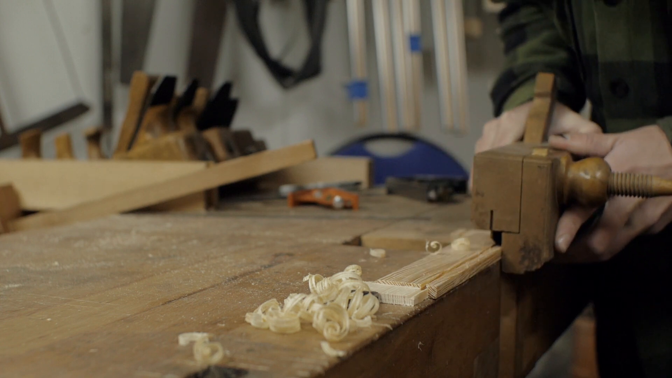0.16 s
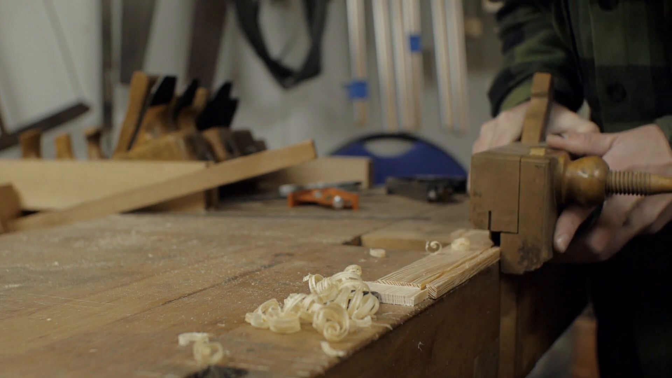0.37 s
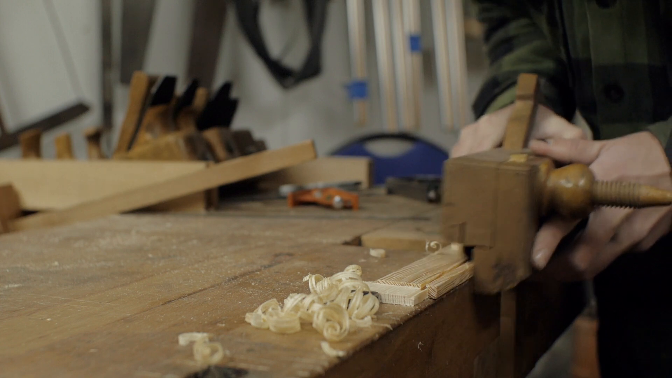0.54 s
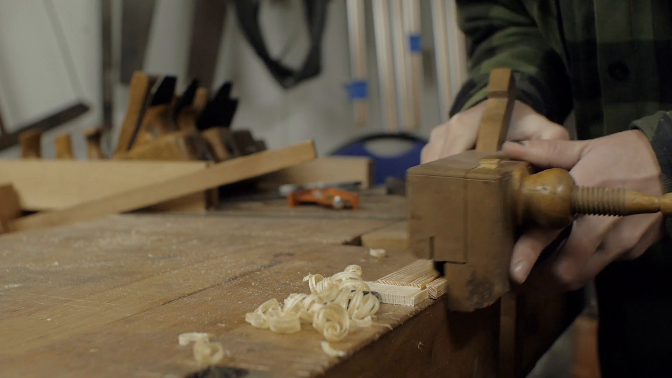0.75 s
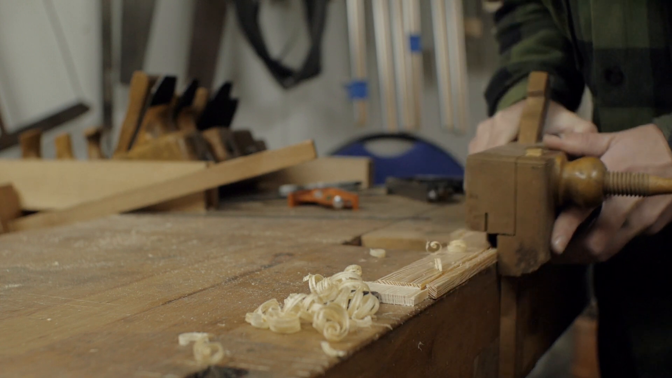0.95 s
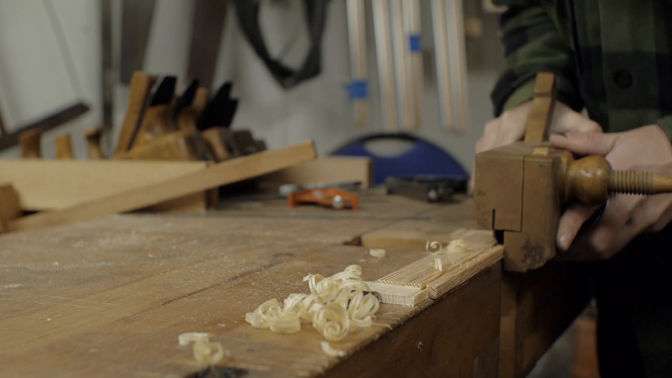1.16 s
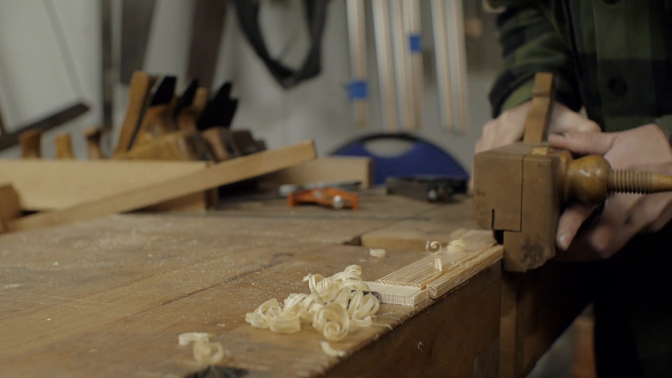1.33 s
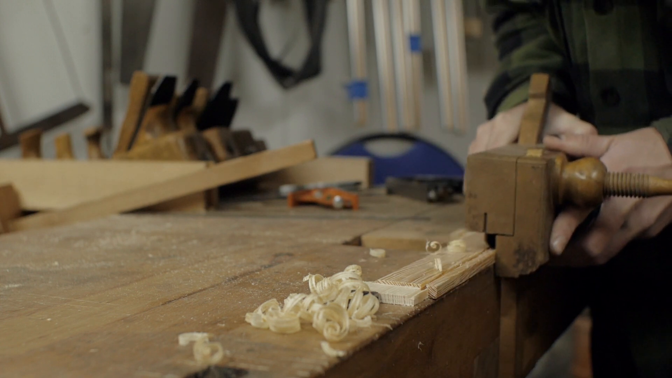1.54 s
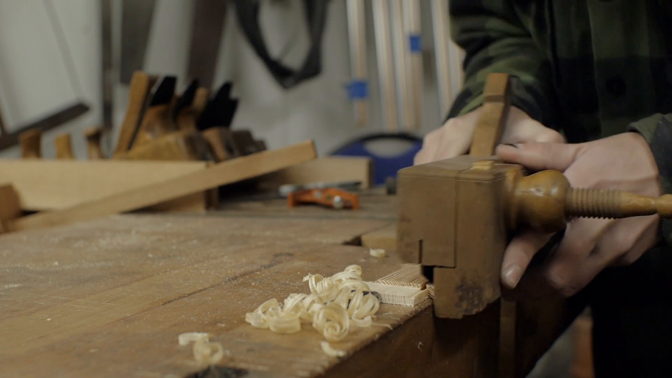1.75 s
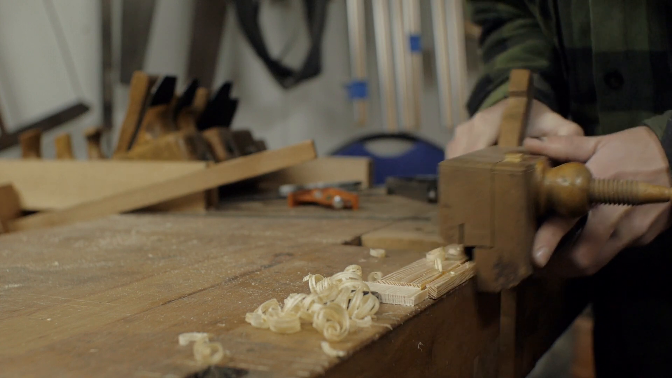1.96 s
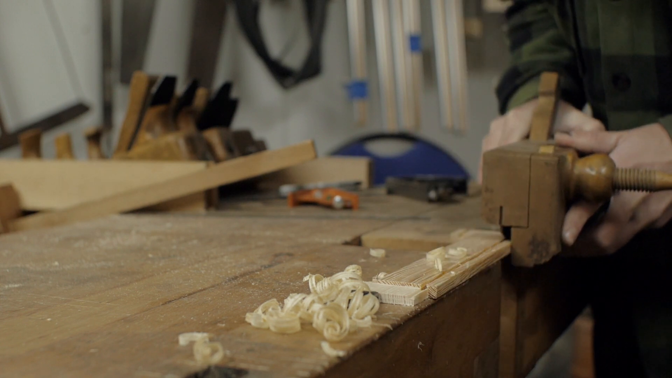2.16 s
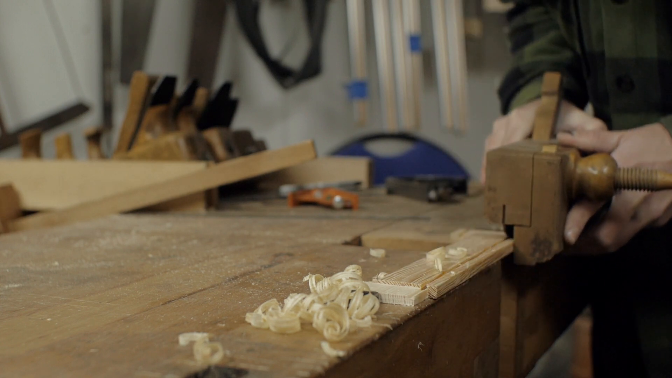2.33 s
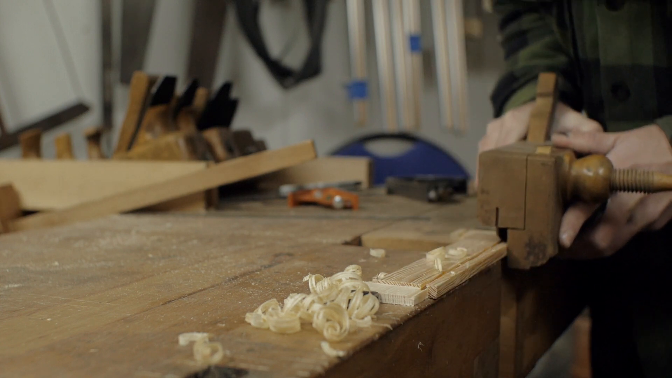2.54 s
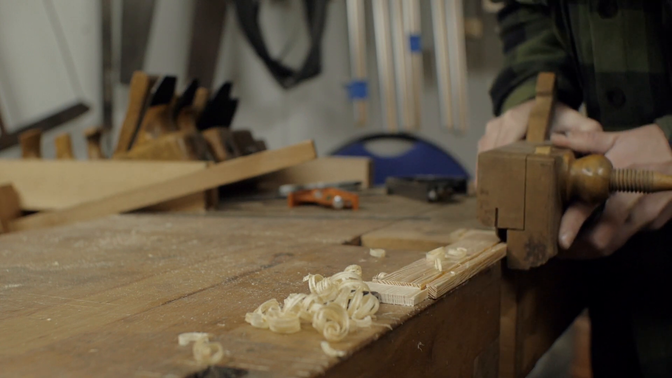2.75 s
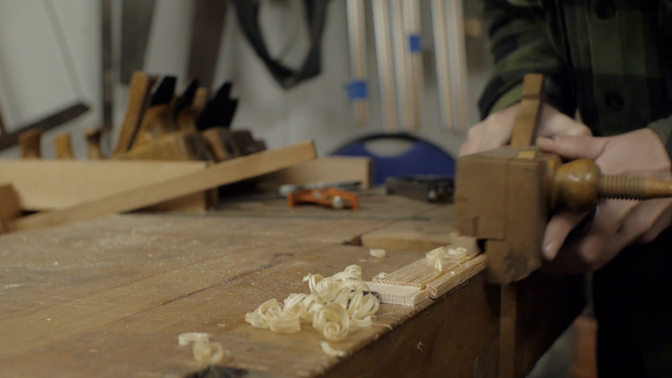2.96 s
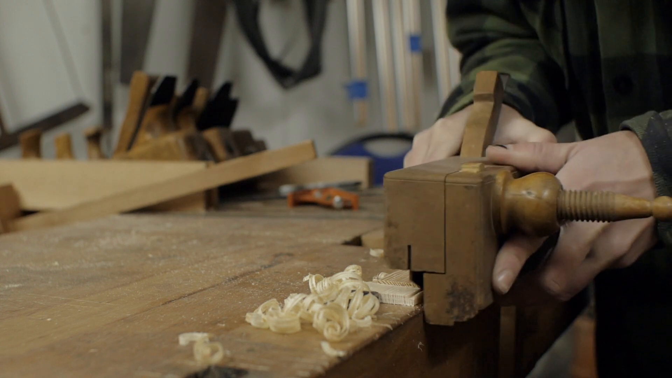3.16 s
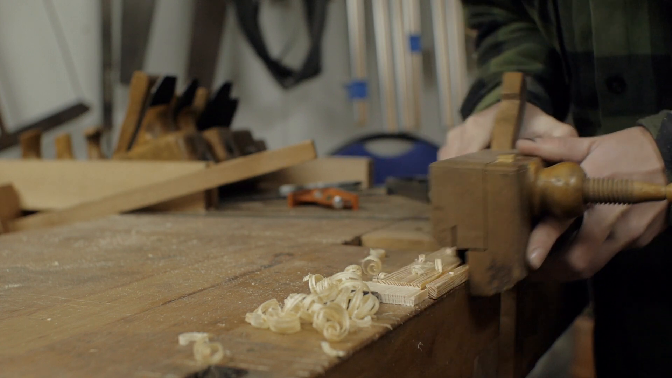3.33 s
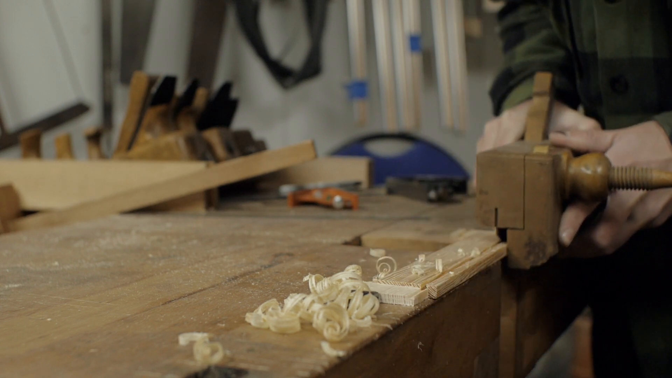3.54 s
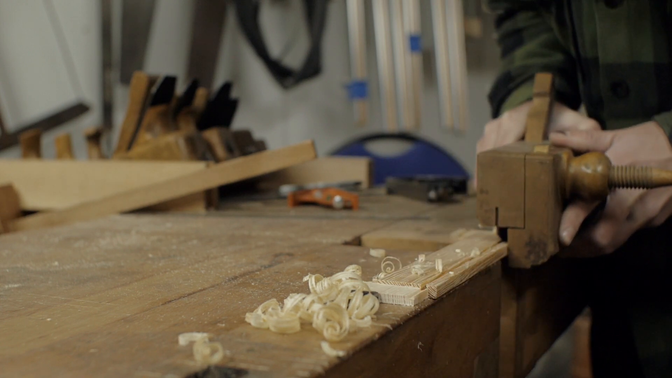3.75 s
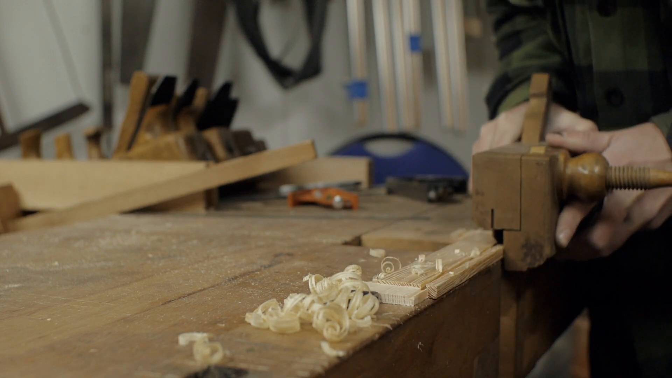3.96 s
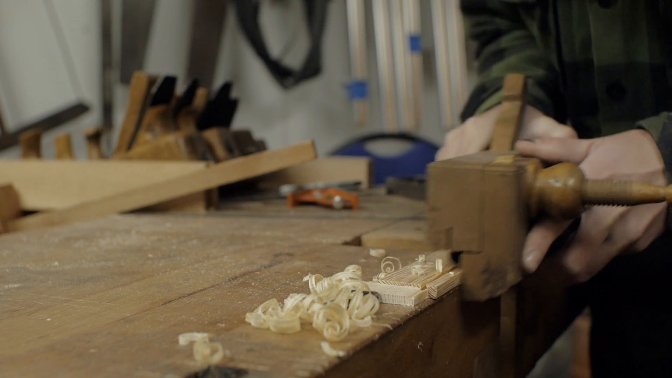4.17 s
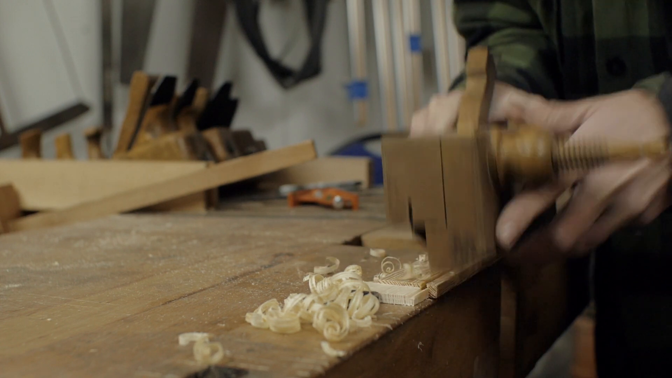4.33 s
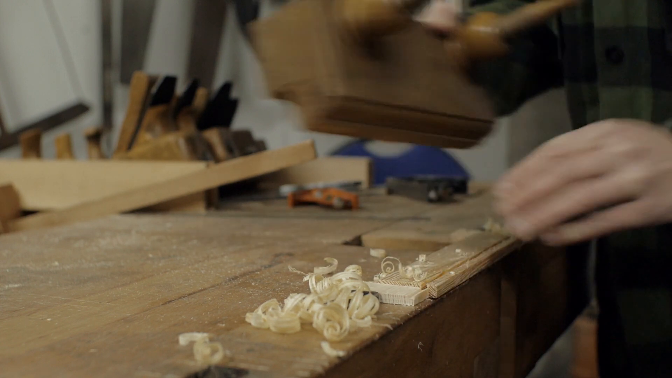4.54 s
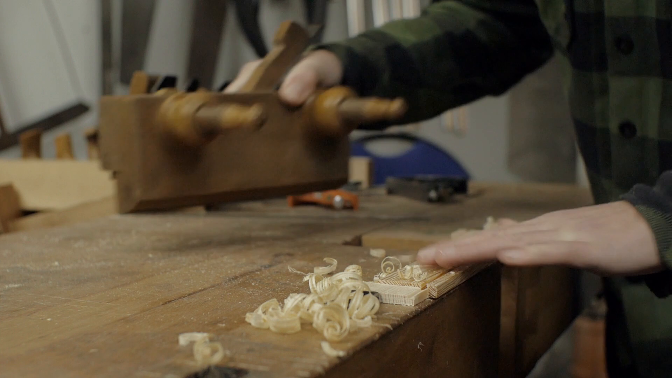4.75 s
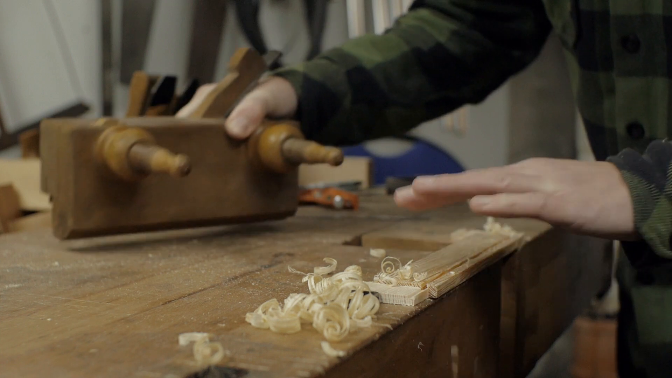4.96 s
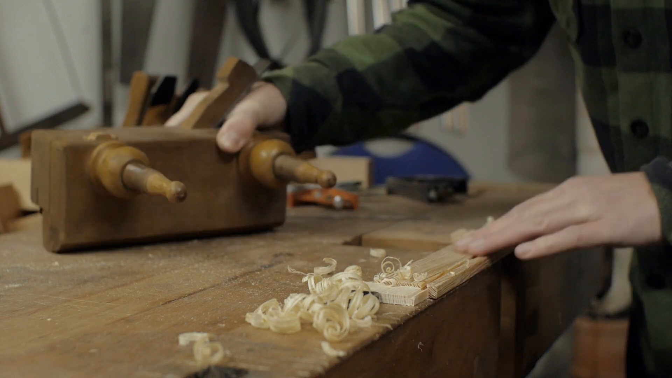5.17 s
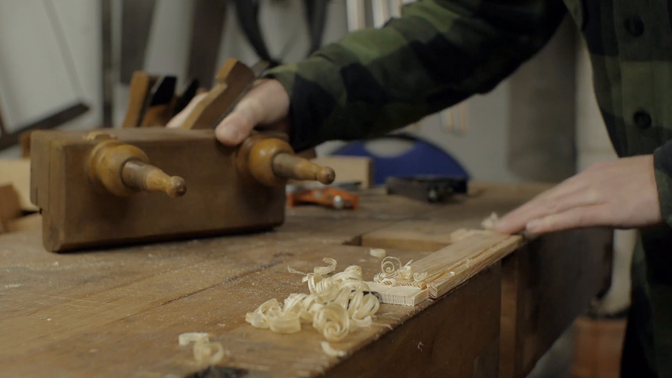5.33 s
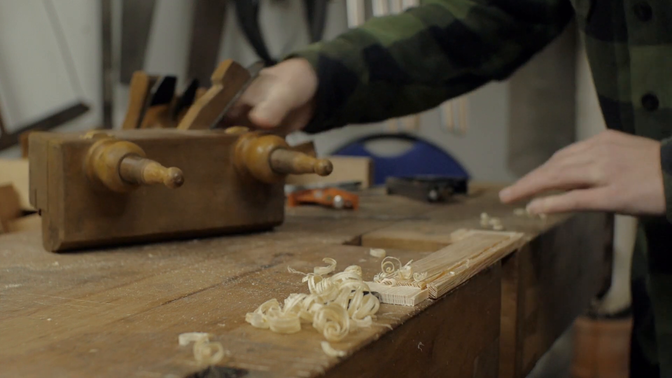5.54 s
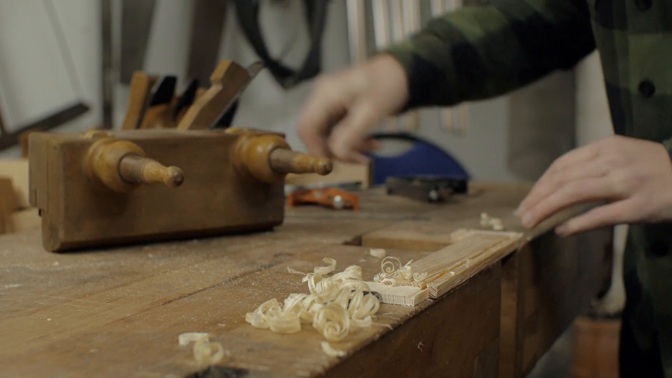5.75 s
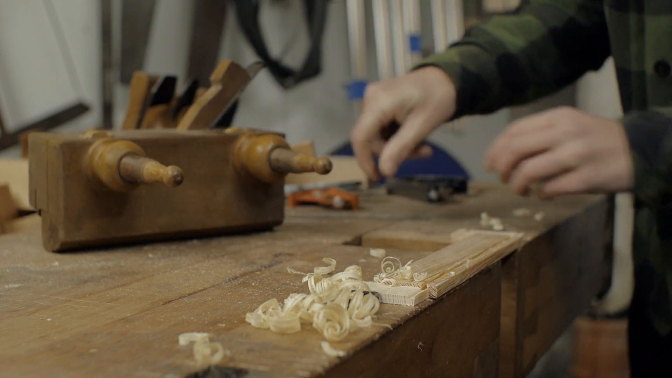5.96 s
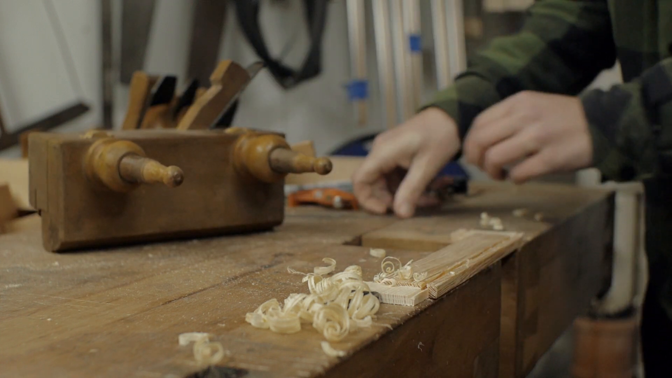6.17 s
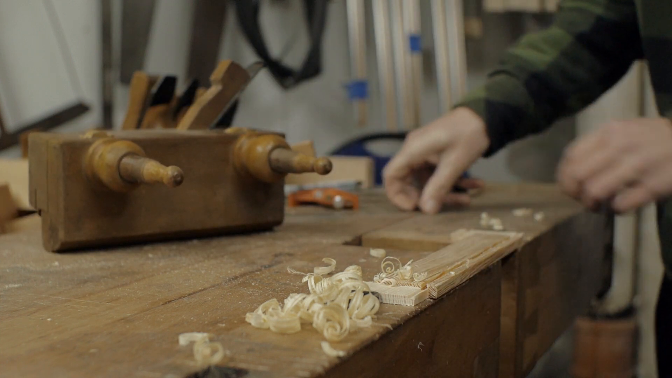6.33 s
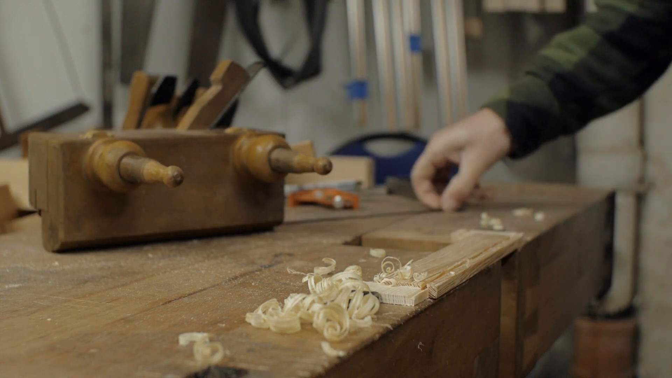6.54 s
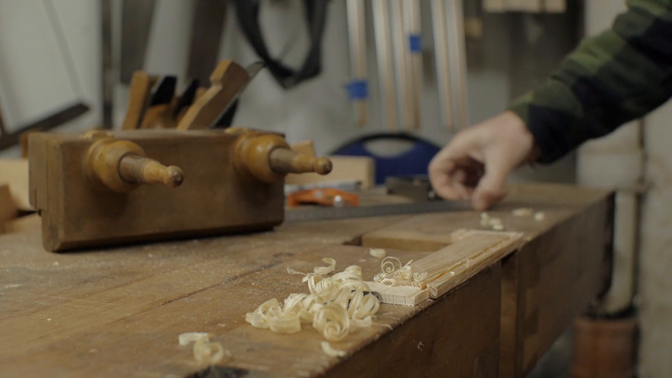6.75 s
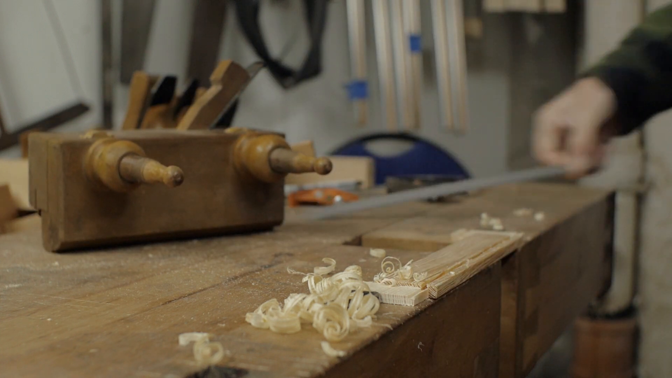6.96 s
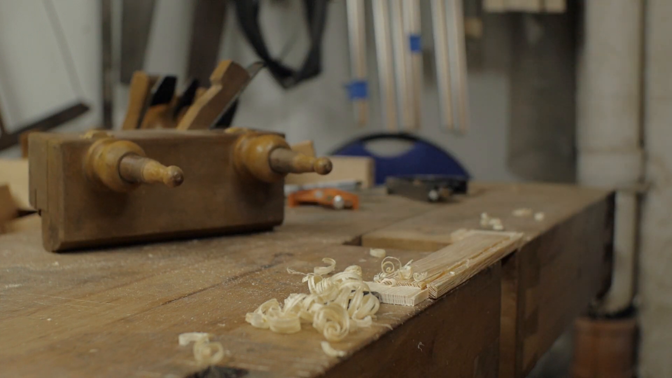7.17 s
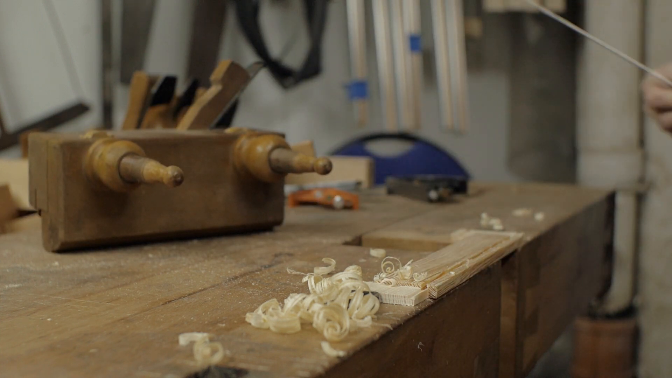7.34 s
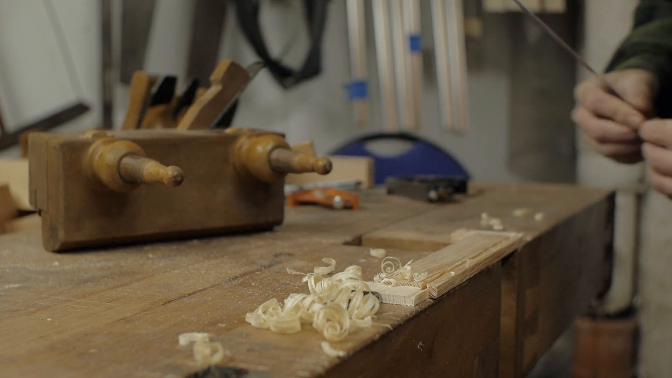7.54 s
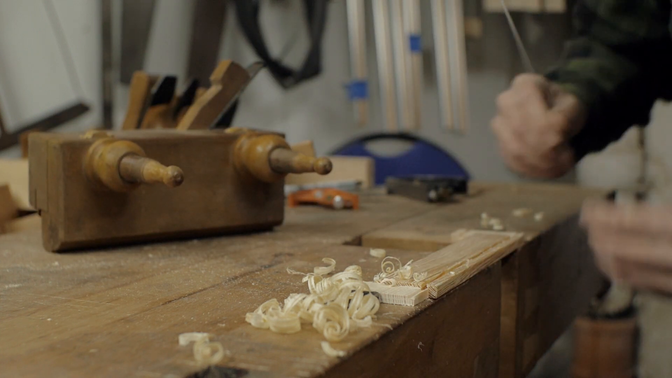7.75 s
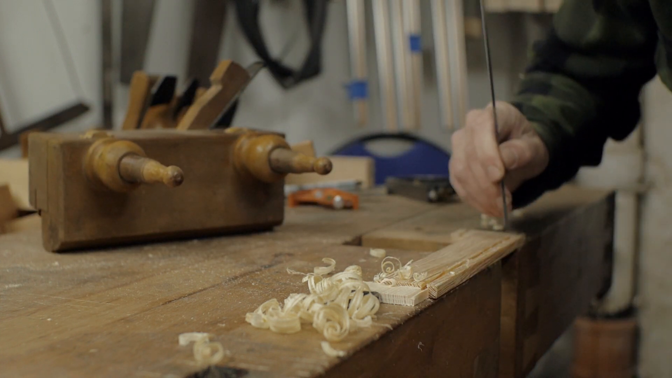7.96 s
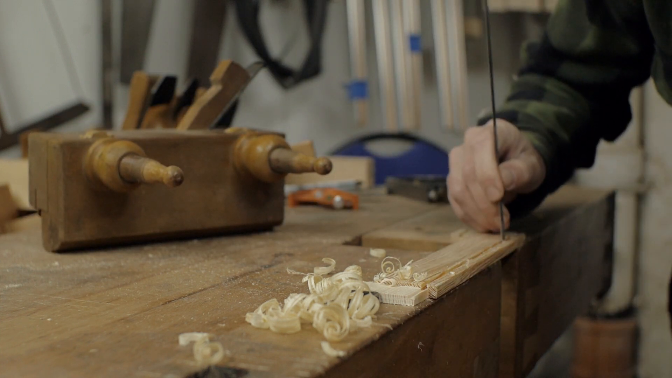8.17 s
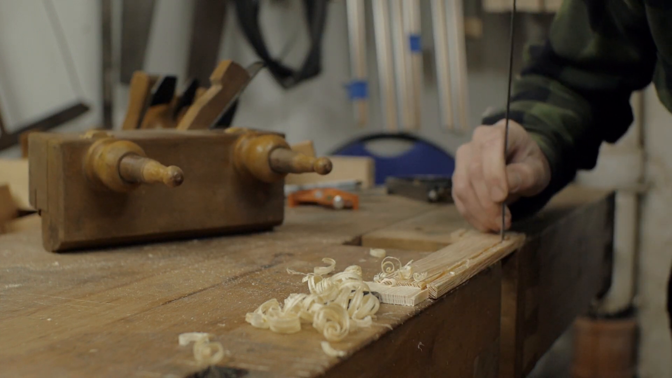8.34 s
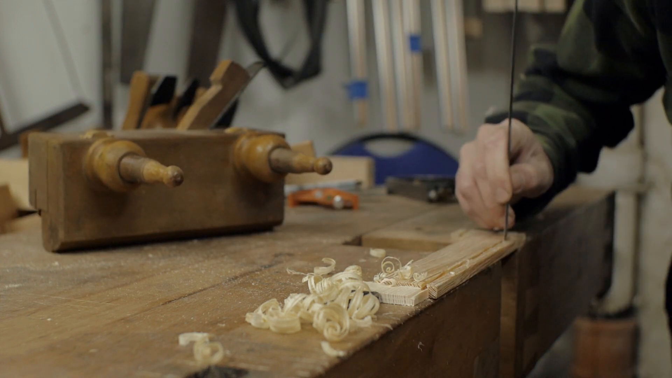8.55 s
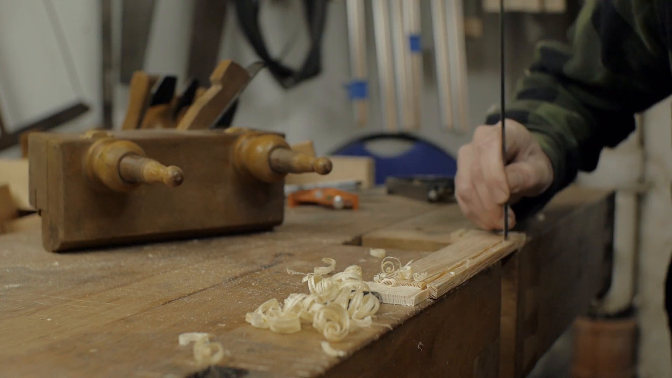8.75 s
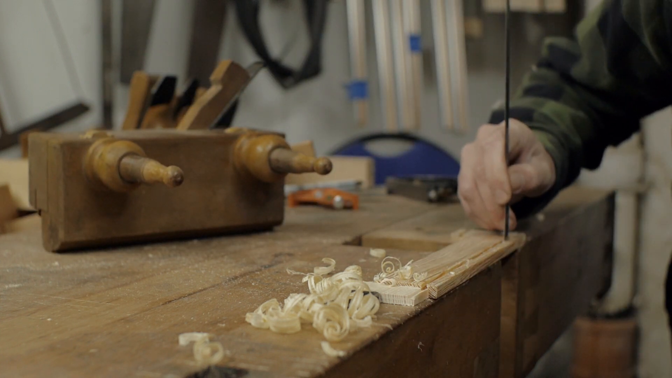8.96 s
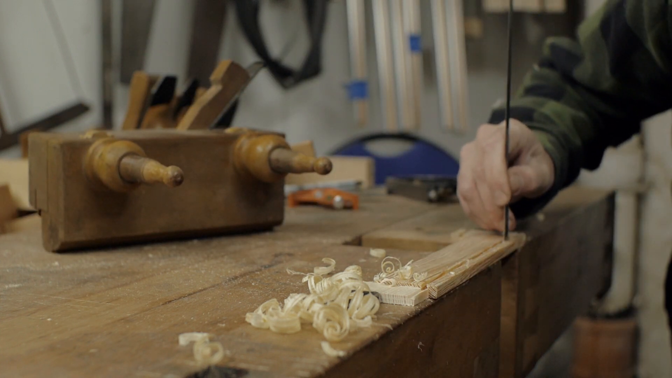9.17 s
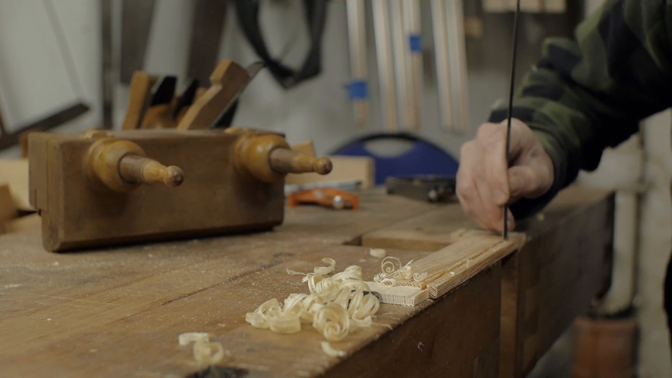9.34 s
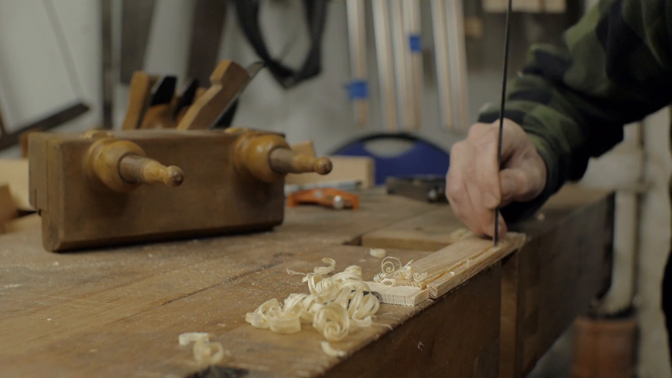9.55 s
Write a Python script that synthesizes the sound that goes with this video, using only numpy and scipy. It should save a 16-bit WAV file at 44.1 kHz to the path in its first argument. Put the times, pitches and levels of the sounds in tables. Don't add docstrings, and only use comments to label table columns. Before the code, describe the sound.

Wooden plough plane rasps four short cutting strokes, then is set down with a clunk; a hand brushes the bench, a steel rule slides and taps.

```python
import sys
import numpy as np
from scipy import signal
from scipy.fft import rfft, irfft, next_fast_len
from scipy.io import wavfile
from scipy.ndimage import uniform_filter1d

SR = 44100
rng = np.random.default_rng(int(sys.argv[2]) if len(sys.argv) > 2 else 0)


def transcribe(u):
    v = np.clip(np.atleast_2d(u).T, -1, 1)
    q = np.round(v * 32767).astype(np.int16)
    wavfile.write(sys.argv[1], SR, q)


def makeup_ratio(level_db):
    decades = np.asarray(level_db, float) / 20
    return 10 ** decades


N = 423342
TIME = np.arange(N) / SR


def unit(x):
    return x / np.sqrt(np.mean(x ** 2) + 1e-30)


def decay(t, t60):
    return np.exp(-np.log(1000) * t / t60)


def colour(x, points):
    hz, db = np.transpose(points)
    size = next_fast_len(len(x))
    f = np.arange(size // 2 + 1) * SR / size + 1
    response_db = np.interp(np.log(f), np.log(hz), db, left=-90, right=-90)
    return unit(irfft(rfft(x, size) * makeup_ratio(response_db), size)[:len(x)])


def band(x, lo_hz, hi_hz):
    edges = [lo_hz, min(hi_hz, .45 * SR)]
    return signal.sosfilt(signal.butter(2, edges, "bandpass", fs=SR, output="sos"), x)


def flutter(per_s, depth_db):
    steps = rng.standard_normal(int(N / SR * 300))
    return np.interp(TIME * per_s, np.arange(len(steps)), makeup_ratio(depth_db * np.clip(steps, -3, 1.8)))


def fibres(per_s, spread_db, hiss):
    snaps = (rng.random(N) < per_s / SR) * rng.standard_normal(N) * makeup_ratio(spread_db * rng.exponential(size=N))
    return unit(unit(snaps) + hiss * rng.standard_normal(N))


def resonate(x, peaks, widen, chatter_db):
    total = 0
    for hz, width_hz, db in peaks:
        mode = unit(signal.lfilter(*signal.iirpeak(hz, hz / (widen * width_hz), SR), x))
        total = total + makeup_ratio(db) * np.sqrt(width_hz) * flutter(22.103, chatter_db) * mode
    return unit(total)


def focus(x, centre_hz, floor, width, patchy_db, reach=2.5):
    total = 0
    for k, hz in enumerate(850 * 1.17 ** np.arange(12)):
        spread = np.where(hz > centre_hz, reach * width, width)
        weight = floor + np.exp(-((np.log(hz) - np.log(centre_hz)) / spread) ** 2)
        weight = flutter(26, patchy_db) * weight
        total = total + (-1) ** k * weight * band(x, hz / 1.09, hz * 1.08)
    return unit(total)


def remoteness(s, rise, fall):
    return np.where(TIME < s, (s - TIME) / rise, (TIME - s) / fall)


# [f/Hz, level/dB]
SHOP = [(12, -33), (20, 7), (46, 1), (93, -13.5), (215, -10.5), (284, -15), (482, -19), (620, -21.5),
        (713, -23), (843, -24.5), (4500, -27.5), (14500, -30.5), (15800, -36)]
# [t/s, level/dB]
RUMBLE = [(0, -75.5), (1.301, -74), (2.5, -72), (3.8, -71), (4.7, -74.5), (5.4, -68.5), (6.599, -63.5),
          (7.4, -69.5), (8.1, -73), (8.899, -78.5), (9.6, -86.5)]


def background():
    hiss_db, air_db, air_follows = -79, -70, 0.62
    shop = [colour(rng.standard_normal(N), SHOP) for _ in range(3)]
    rumble = unit(band(shop[0], 15, 80))
    air = unit(band(shop[1], 70, 1500))
    hiss = unit(band(shop[2], 900, 17000))
    bustle_db = np.interp(TIME, *np.transpose(RUMBLE))
    rumble = rumble * makeup_ratio(bustle_db) * flutter(2.8, 2.9)
    air = air * makeup_ratio(air_db + air_follows * (bustle_db + 72.0)) * flutter(6.9, 2.9)
    return rumble + air + hiss * makeup_ratio(hiss_db)


# [f/Hz, t60/s, level/dB]
ROOM = [(200, 0.43, -8), (463, .42, -12), (1191.6, .42, -11), (2800, 0.35, -12), (6980, 0.3, -12),
        (12000, 0.1, -14.5)]


def workshop(struck, rubbed):
    scatter = .06
    t, size = TIME[:SR], next_fast_len(N + SR)
    rise = np.clip((t - .003) / 0.0091, 0, 1)
    struck, rubbed, heard = rfft(struck, size), rfft(rubbed, size), 0
    for hz, t60, db in ROOM:
        for side in (-1, 0, 1):
            noise = band(rng.standard_normal(SR), hz / 1.605, hz * 1.83)
            tail = noise * decay(t, t60) / np.sqrt(t60 * SR / 4.7)
            shifted = np.roll(struck, int(side * scatter * hz * size / SR))
            heard = heard + makeup_ratio(db) * (rubbed + shifted) * rfft(rise * tail, size)
    return irfft(heard, size)[:N]


def swells(rows):
    return sum(makeup_ratio(db - 30 * np.minimum(remoteness(s, rise, fall), 4)) for s, rise, fall, db, _ in rows)


# [f/Hz, width/Hz, level/dB]
STOCK = [(147, 22, -7.5), (245, 300, -2), (455, 52, 3.5), (650, 14, -12.5)]
# [f/Hz, level/dB]
SKIN = [(2200, -38), (3300, -5.5), (4500, -8.5), (6000, -6), (8500, -3.5), (10300, -17), (12900, -5.5),
        (15800, -19.5)]
# [loudest t/s, rise/s, fall/s, level/dB, centre f/Hz]
WIPES = [(2.59, 0.1, 0.4, -63.5, 2000), (6.76, 0.065, .05, -66, 3020), (4.81, 0.033, 0.21, -56.5, 2800),
         (4.87, .1, 0.037, -64, 2706), (5.25, 0.21, 0.37, -64, 1400), (5.35, .3, 0.71, -64.5, 1500),
         (5.458, 0.091, 0.063, -52, 3560), (5.8, .08, 0.77, -64.5, 2232), (6.215, 0.02, 0.27, -55.5, 1550),
         (6.32, .2, 0.21, -58.5, 1700), (6.5, .3, 0.3, -67.5, 1553), (6.72, 0.31, 0.66, -70.5, 2170),
         (6.835, 0.07, 0.32, -63, 1500), (7.83, 0.073, 0.13, -70, 1764), (7.94, .2, 0.19, -76, 1876),
         (9.48, 0.028, .9, -75, 1110)]
# [loudest t/s, rise/s, fall/s, level/dB, centre f/Hz]
SCRAPES = [
    (5.3, 0.46, 0.34, -100, 1300),
    (5.56, .008, 0.11, -42, 2180),
    (6.202, 0.002, 0.2, -40.5, 1704),
    (6.369, 0.32, 0.33, -63.5, 2150),
    (6.831, 0.018, 0.1, -44.5, 1460),
    (7.107, 0.16, 0.11, -51.5, 1600),
    (7.158, 0.11, 0.077, -50.5, 1700),
    (9.477, 0.05, 0.3, -59.5, 1002),
    (9.595, 0.083, .3, -51.5, 967),
]


def rubbing():
    wipe_db, scrape_db = (-3.5, -11, -4), (-11, -3.5, -19.5)
    rows = np.array(sorted(WIPES + SCRAPES))
    centre_hz = np.interp(TIME, rows[:, 0], rows[:, 4])
    scrape = focus(fibres(5000, 1.5, 1.1), centre_hz, floor=.16, width=.24, patchy_db=1.5)
    bench = resonate(fibres(900, 1.5, 1.0), STOCK[1:], 2.5, chatter_db=2.0)
    bench = bench * makeup_ratio(-8.1 * np.log2(centre_hz / 1600))
    skin = colour(fibres(8700, 1.5, 1.1) * flutter(90, 0.99), SKIN)
    wipes, scrapes = swells(WIPES), swells(SCRAPES)
    parts = zip((bench, scrape, skin), wipe_db, scrape_db)
    return sum(x * (makeup_ratio(wipe) * wipes + makeup_ratio(drag) * scrapes) for x, wipe, drag in parts)


# [t/s, level/dB, modes as (f/Hz, level/dB, t60/s)]
SINGS = [
    (6.833, -50, [(935, 6, .1), (2890, -14, .22), (6260, -10, .06), (8160, -8, .04)]),
    (6.631, -78, [(3650, -3, .2), (4500, 0, .12), (5020, 0, .12)]),
    (8.29, -72, [(1890, 0, .15)]),
    (5.86, -62, [(5500, 0, .15)]),
]


def rule_lift():
    total = 0
    for s, level_db, modes in SINGS:
        since = np.maximum(TIME - s, 0)
        for hz, db, t60 in modes:
            total = total + makeup_ratio(level_db + db) * np.sin(2 * np.pi * hz * since) * decay(since, t60)
    return total


def ring(modes, factor, chance, rattle, centre_hz=None, tilt_db=0, clear_hz=900, push_s=.0012):
    t = TIME[:len(rattle)]
    hz, db, t60 = (c[:, None] for c in np.transpose(modes))
    db = db + tilt_db * np.log2(hz / hz.min())
    if centre_hz:
        db = db - np.minimum(16.3 * np.abs(np.log2(hz / centre_hz)), 24)
    fade = decay(t, t60 * np.clip(factor, .2, 4))
    luck = chance[:len(modes), :, None]
    waves = np.sin(2 * np.pi * hz * (1 + .02 * luck[:, 0]) * t) * makeup_ratio(2.1 * luck[:, 1]) * np.sign(luck[:, 2])
    waves = waves / (1 + (hz / clear_hz) ** 2)
    crowd = []
    for k, f in enumerate(hz[:, 0]):
        noise = np.roll(rattle, k * len(rattle) // 10)
        crowd.append(unit(band(band(noise, f / 1.25, f * 1.253), f / 1.6, f * 1.5)))
    waves = waves + 900 / (600 + clear_hz) * np.array(crowd)
    push = 1 - np.exp(-(t / push_s) ** 3)
    x = np.sum(makeup_ratio(db) * waves * fade, axis=0) * push
    return x / np.sqrt(np.mean(x[:SR // 100] ** 2))


def blows(events, main, second, high, trim_db, per_octave_db, clear_hz, push_s):
    out, size = np.zeros(N + SR), SR // 7
    chance, noise = rng.standard_normal((30, 10, 3)), rng.standard_normal((30, size))
    contact = dict(clear_hz=clear_hz, push_s=push_s)
    for (s, db, hz, hard_db, factor), luck, rattle in zip(events, chance, noise):
        second_db = per_octave_db * np.log2(hz / main[4][0]) + 0.29 * (hard_db + 21.5)
        tilt_db = np.clip(0.48 * (hard_db - second_db + 30.0), -11, 4)
        low = ring(main, factor, luck, rattle, hz, **contact)
        middle = ring(second, factor, luck, rattle, tilt_db=tilt_db, **contact)
        top = ring(high, factor, luck, rattle, **contact)
        blow = makeup_ratio(db + trim_db[0]) * low
        blow = blow + makeup_ratio(db + second_db + trim_db[1]) * middle
        blow = blow + makeup_ratio(db + hard_db + trim_db[2]) * top
        i = int(s * SR)
        out[i:i + size] += blow
    return out[:N]


# [f/Hz, level/dB, t60/s]
BLADE = [(950, -7.5, 0.028), (1150, -5.5, 0.022), (1320, -4.5, 0.02), (1865, -3.5, 0.056), (2250, 3, 0.013),
         (2848, 0.5, 0.022), (3573, -22, 0.0061)]
# [f/Hz, level/dB, t60/s]
EDGE = [(4094, 4, 0.0086), (5400, -3.5, 0.011), (5860, -8, 0.04), (7960, 4.5, 0.012), (8800, -6, .006),
        (12000, -9, 0.0029), (14600, -8.5, 0.0043)]
# [t/s, strength/dB, blade centre f/Hz, hardness/dB, ring factor]
TICKS = [(4.946, -64.5, 1820, -4, 0.52), (5.686, -66, 1400, -6.5, 1.06), (6.631, -56, 3510, 0, 2.7),
         (6.791, -47, 1840, -13, 0.99), (6.817, -58, 1320, 9, 1.6), (6.833, -54.5, 970, 8, 1.1),
         (6.922, -55.5, 2945, -3.5, 1.1), (7.848, -70, 918, -14.5, 1.2), (8.279, -38, 1150, -31.5, 0.94),
         (8.286, -46, 1870, -31, 0.4), (8.32, -45.5, 950, -23, 1.16), (8.353, -64.5, 1166, -16, 0.62),
         (8.574, -43, 2280, -19.5, 0.8), (8.583, -49.5, 800, -12, 1.07), (9.474, -48.5, 1053, -20, 5.9),
         (8.755, -67, 1700, -17, .5), (2.82, -65, 1900, -18, .5), (2.93, -67, 2100, -15, .5)]


def rule_ticks():
    return blows(TICKS, BLADE, THUD[4:], EDGE, trim_db=(-9.1, -18.1, -4.1),
                 per_octave_db=-5.5, clear_hz=2300, push_s=0.00035)


# [f/Hz, level/dB, t60/s]
THUD = [(135, -8.5, 0.11), (174.6, -8.5, 0.034), (280.3, -6, 0.18), (327, -11.5, 0.041), (430, -6, 0.1),
        (477, -1, 0.11), (562, -3, 0.083), (665, 4, .06), (766, -1.5, 0.044)]
# [f/Hz, level/dB, t60/s]
KNOCK = [(922, -4.5, 0.039), (1070, -3, 0.031), (1200, -4, 0.045), (1400, -5, 0.027), (1700, -2, 0.027),
         (2100, 1, 0.016), (2600, -10.5, 0.018), (3260, -15.5, 0.011)]
# [f/Hz, level/dB, t60/s]
CRACK = [(3740, -3, 0.062), (4840, -7, 0.05), (5650, 1.5, 0.032), (7600, 1, 0.016), (10100, -16, 0.017),
         (13600, -10, 0.019)]
# [t/s, strength/dB, thud centre f/Hz, hardness/dB, ring factor]
KNOCKS = [(0.516, -30, 493, -34, 2.6), (2.521, -56, 368, -25, 5.4), (2.622, -27.5, 440, -16.5, 0.63),
          (2.818, -51, 165, -26.5, 0.87), (2.903, -52.5, 170.4, -39.5, 1.7), (3.837, -39, 534, -19.5, 0.76),
          (4.609, -46.5, 170, -44, 1.27), (4.658, -66, 168, -34.5, 0.8), (5.152, -25.5, 393, -37, 0.59),
          (5.298, -43.5, 440, -43, 0.51), (5.595, -42, 457, -22, 0.5), (5.813, -28.5, 483, -37, 0.8),
          (5.858, -21.5, 437.6, -28.5, 1.8), (5.878, -27.5, 640, -46.5, 0.5), (5.940, -9, 603, -57, 0.54),
          (5.963, -5.5, 540, -28.5, 0.95), (5.983, -11.5, 611, -34, 0.38), (6.002, -9, 539, -43.5, 0.42),
          (3.225, -27.5, 447, -37.5, 1.06), (4.165, -22.5, 451, -42, 0.84), (2.795, -48.5, 170, -35, 0.89),
          (1.6, -36, 497, -46, 1.8), (2.97, -43.5, 139.7, -29.5, 0.43), (3.845, -47, 174, -42, 0.65),
          (5.153, -32.5, 191, -34, 0.46), (5.297, -34.5, 158, -52, 0.59), (5.558, -49.5, 250, -44, .6),
          (5.597, -45, 270, -44, 0.42), (2.625, -43, 135, -48, 0.6), (6.104, -27, 500, -54, 0.57)]


def wood_knocks():
    return blows(KNOCKS, THUD, KNOCK, CRACK, trim_db=(-8.1, -14.1, -3.1),
                 per_octave_db=10.0, clear_hz=670, push_s=0.0022)


# [t/s, strength/dB, centre f/Hz, hardness/dB, ring factor]
JOLTS = [(0.58, -25, 570, -38, .6), (0.993, -49, 455, -41, 0.87), (1.015, -35, 463, -44, .8),
         (1.88, -30.5, 473, -43, 0.81), (2.032, -38, 467, -40, 0.73), (2.992, -41, 694, -36.5, 0.65),
         (3.042, -37.5, 665, -34, .6), (3.406, -40, 300, -40, 0.61), (4.036, -34.5, 440, -46.5, 0.92),
         (4.095, -31.5, 650, -45, .6), (4.134, -21.5, 464, -44.5, 0.71), (4.208, -31.5, 670, -47.5, 0.88),
         (4.243, -25.5, 665, -40, 0.9)]
# [t/s, strength/dB, centre f/Hz, hardness/dB, ring factor]
RATTLES = [
    (5.941, -19, 755, -58, .35),
    (6.024, -22, 600, -44.5, 0.3),
    (6.047, -22, 480, -40, 0.45),
    (6.068, -25, 600, -43, 0.36),
    (6.13, -35, 480, -43.5, 0.28),
]


def jolts_and_rattles():
    return blows(JOLTS + RATTLES, THUD[3:], KNOCK, CRACK, trim_db=(-8.1, -18.1, -3.1),
                 per_octave_db=4.5, clear_hz=900, push_s=0.0037)


# [t/s, strength/dB, knock centre f/Hz, hardness/dB, ring factor]
CATCHES = [(1.0415, -35.5, 1780, -27, 1.3), (1.634, -31, 1090, -18, 2.2), (1.8138, -41, 3290, 3.5, 1.1),
           (2.032, -34.5, 1900, -24, 1.4), (2.141, -36.5, 2110, -17, 1.3),
           (2.2604, -39.5, 1270, -15.5, 0.61), (3.1597, -23.5, 1990, -16, 1.2), (3.6865, -45, 1900, -8, .7),
           (0.5187, -51, 1400, -21, 0.72), (0.6021, -28.5, 1200, -19.5, 1.6),
           (0.6869, -28.5, 950, -23.5, 2.4), (1.7345, -30.5, 1400, -13, 0.76), (1.8557, -49, 1500, -27, .9),
           (2.9697, -41, 1250, -6.5, .9), (3.0041, -30, 1200, -15, 1.2), (3.0819, -28, 2600, -9, 1.2),
           (3.1168, -31.5, 3200, -6.5, 0.95), (3.2146, -29, 1500, -10.5, 0.59),
           (3.4665, -39, 2200, -12, .9), (3.5119, -44, 1700, -3, 1.1), (3.5509, -37, 2100, -18, .9),
           (4.2024, -32, 2100, -13, 0.71)]


def iron_catches():
    return blows(CATCHES, KNOCK, THUD[4:], CRACK, trim_db=(-9.1, -16.1, -6.1),
                 per_octave_db=-3.5, clear_hz=1500, push_s=.0006)


# [loudest t/s, rise/s, fall/s, level/dB, pitch f/Hz]
RINGS = [(0.565, 0.13, .15, -45.5, 2200), (0.59, 0.11, .15, -54, 3250), (0.625, 0.074, 0.061, -38, 1100),
         (0.715, 0.084, 0.083, -49, 3300), (0.96, .1, 0.16, -48.5, 2250), (0.97, 0.3, .15, -61, 3250),
         (1.02, 0.2, 0.18, -51, 230), (1.06, .04, 0.13, -53, 1750), (1.645, 0.045, 0.12, -49, 3250),
         (1.745, 0.042, 0.1, -41.5, 1256), (1.81, .08, 0.09, -48.5, 190), (2.02, .06, 0.097, -51, 3300),
         (2.05, .1, .3, -48.5, 180), (2.14, .03, 0.093, -45.5, 2050), (3.03, .12, 0.087, -43, 1200),
         (3.06, .1, 0.18, -41.5, 2800), (3.08, .15, .2, -43, 2250), (3.41, 0.082, 0.16, -49.5, 200),
         (3.49, 0.11, .15, -46.5, 2300), (3.52, 0.055, 0.092, -50, 1250), (4.06, 0.074, 0.23, -50, 1450),
         (6.27, .08, 0.11, -47.5, 1247), (4.19, 0.067, 0.12, -43, 1650), (4.235, .06, .1, -47.5, 1100),
         (4.24, .08, 0.22, -38.5, 1450), (4.29, .1, .1, -47, 2350), (4.34, .12, 0.077, -37, 1400),
         (7.13, 0.25, 0.15, -56, 1750), (7.08, 0.11, .2, -56.5, 1250), (6.215, 0.034, 0.091, -43.5, 1780),
         (5.575, .03, 0.041, -48, 1600), (8.37, .12, 0.3, -68.5, 690)]
# [loudest t/s, rise/s, fall/s, level/dB, pitch
# f/Hz]
MORE_RINGS = [(0.97, .08, 0.1, -56, 8250), (1.07, 0.053, 0.084, -67, 8600), (1.056, .02, .12, -53, 2280),
              (1.655, 0.073, 0.089, -37.5, 690), (1.742, 0.034, 0.061, -38, 1840),
              (1.865, 0.034, .05, -40, 1600), (2.65, 0.036, 0.092, -46, 430), (3.118, .03, .05, -33, 3300),
              (3.165, .03, 0.034, -35.5, 930), (3.165, .03, .05, -32.5, 2000), (3.3, .1, 0.51, -47.5, 444),
              (4.21, .04, .06, -35.5, 2100), (2.11, 0.08, 0.14, -46, 474), (4.37, .05, 0.086, -53.5, 3600),
              (4.27, .08, .06, -44.5, 5000), (9.55, 0.14, .3, -56.5, 600), (4.06, .05, .15, -50, 5100)]


def rings():
    half_width, trim_db, fade_db = 0.03, -4.5, 61
    force = fibres(3000, 1.9, 1.3)
    total = 0
    for s, rise, fall, db, hz in RINGS + MORE_RINGS:
        mode = unit(band(force, hz / (1 + half_width) - 12, hz * (1 + half_width) + 12))
        level_db = db + trim_db - fade_db * np.minimum(remoteness(s, rise, fall), 2) ** 2
        total = total + makeup_ratio(level_db) * mode
    return total


def moving(strokes):
    s, pressure_db, keen_db = np.vstack(sorted(strokes, key=lambda rows: rows[0][0])).T
    on = sum((TIME >= rows[0][0]) & (TIME < rows[-1][0]) for rows in strokes) > 0
    return on, np.interp(TIME, s, pressure_db), np.interp(TIME, s, keen_db)


# [f/Hz, width/Hz, level/dB]
IRON = [(1079, 12, 5.5), (1360, 57, -21.5), (2216, 12, 7), (2432, 69, 0.5), (2740, 25, -3),
        (3246, 120, 2.5), (3820, 35, -17.5), (4180, 69, -18), (5100, 300, -8)]
# [f/Hz, level/dB]
CUT = [(59, -52.5), (100, -36), (364, -21), (451, 2.5), (540, -8), (668, 11), (826, -7.5), (1090, -10.5),
       (5000, -18), (6500, -38), (11000, -120)]
# [f/Hz, level/dB]
SHAVING = [(2350, -31), (4000, -7), (4190, -3.5), (4490, -9), (4890, -2), (5710, -6.5), (8110, -5.5),
           (9920, -14.5), (10400, -13.5), (14100, -13), (15800, -26.5)]
# [t/s, pressure/dB, keenness of the shaving against the cut/dB]
PUSHES = [
    [(0.46, -70.5, -16), (0.508, -57, -6), (0.522, -34, -19), (0.55, -44.5, -8), (0.616, -30.5, -16.5),
     (0.668, -47.5, -4.5), (0.694, -27.5, -11), (0.842, -65, -8), (0.86, -56, -7.5)],
    [(1.52, -67.5, -7), (1.63, -39.5, -17), (1.634, -35, -13), (1.7, -46.5, -10), (1.734, -35.5, -9.5),
     (1.84, -43.5, -7.5), (1.86, -33, -13.5), (1.926, -58.5, -11), (1.97, -51.5, -6)],
    [(2.955, -64.5, -2.5), (2.984, -42, -6.5), (3.004, -35, -11.5), (3.174, -27.5, -11.5),
     (3.206, -40.5, -5.5), (3.22, -34.5, -12.5), (3.296, -56.5, -13.5), (3.35, -57, -3.5)],
    [(3.995, -63.5, -10.5), (4.036, -45, -10.5), (4.146, -31.5, -15), (4.19, -36, -11.5),
     (4.218, -24.5, -20), (4.278, -31, -11.5), (4.34, -28, -14), (4.372, -42.5, -10), (4.56, -75, -13.5)],
]
# [t/s, pressure/dB, keenness/dB]
RETURNS = [
    [(0.86, -57, -12), (0.95, -47, -6.5), (1.02, -54.5, -9.5), (1.032, -44, -8.5), (1.044, -58, -7.5),
     (1.07, -50.5, -7.5), (1.29, -86, -4.5)],
    [(1.97, -59, -5.5), (2.042, -49, -7.5), (2.1, -54, -7.5), (2.148, -51.5, -7), (2.194, -53.5, -4.5),
     (2.25, -46.5, -8.5), (2.46, -108, -6.5)],
    [(3.35, -50.5, -9.5), (3.46, -49.5, -9), (3.476, -39.5, -10), (3.558, -50, -9), (3.59, -51.5, -4.5),
     (3.7, -61.5, -7), (3.8, -79, -20)],
]
# [cutting centre f/Hz, stock level/dB, bench level/dB, reach into the treble]
GRIPS = [
    (1500, -4.5, 1, 2),
    (1900, -1.5, 4.5, 1.7),
    (1600, -1.5, -2.5, 2.2),
    (1900, -1, 2, 2.2),
    (2000, -7.5, 1.5, 2.1),
    (2000, -4, 1.5, 2.46),
    (1423, -2.5, -16, 1.7),
]


def plane():
    dull_db, octaves_per_db, octaves_per_push_db = -11.5, 0.42, 0.12
    pivot_db, stock_follows, stock_per_keen = -48, 0.42, -0.89
    bench_base_db, bench_lags = 6.5, 0.43
    strokes = list(PUSHES) + list(RETURNS)
    on, pressure_db, shaving_db = moving(strokes)
    keen_db = shaving_db - dull_db
    push_db = pressure_db - pivot_db
    starts = sorted(rows[0][0] for rows in strokes)
    stroke = np.maximum(np.searchsorted(starts, TIME) - 1, 0)
    grip_hz, grip_db, grip_bench_db, reach = np.array(GRIPS)[stroke].T

    grain = flutter(60, 2.8)
    judder = fibres(900, 1.6, .9) * grain * flutter(90, 1.2)
    stock = unit(resonate(judder, STOCK, 0.72, chatter_db=5.0) + 0.72 * colour(judder, CUT[1:7]))

    tear = fibres(3000, 0.55, 1.1) * grain
    chatter = resonate(tear, IRON, 1.4, chatter_db=3.0)
    octaves = octaves_per_db * keen_db + octaves_per_push_db * (push_db - 11.0)
    centre_hz = grip_hz * 2 ** np.clip(octaves, -1, 1)
    cut = chatter + 3.7 * colour(tear, CUT[6:])
    iron = focus(cut, centre_hz, floor=0.52, width=0.46, patchy_db=4.0, reach=reach)

    curl = colour(fibres(6000, 2.66, .9) * grain * flutter(200, 0.89), SHAVING)
    shaving = 0
    for k, hz in enumerate(3000 * 1.166 ** np.arange(12)):
        shaving = shaving + (-1) ** k * flutter(20, 4.0) * band(curl, hz / 1.08, hz * 1.08)
    shaving = unit(shaving)

    stock_db = pivot_db + stock_follows * push_db + stock_per_keen * keen_db
    stock_db = stock_db + 0.72 * np.minimum(push_db, 0) + uniform_filter1d(grip_db, size=2000)
    bench_db = bench_base_db + grip_bench_db - bench_lags * np.maximum(push_db, 0)
    stock = band(stock, 330, 4000) - makeup_ratio(bench_db) * band(stock, 50, 330)
    edge = makeup_ratio(pressure_db) * (makeup_ratio(-4.0) * iron + makeup_ratio(shaving_db) * shaving)
    return uniform_filter1d(1. * on, size=1500) * (makeup_ratio(stock_db) * stock + edge)


def scene():
    hits, ticks = wood_knocks(), rule_ticks()
    slides = iron_catches() + jolts_and_rattles() + rings() + rule_lift() + rubbing() + plane()
    room = workshop(makeup_ratio(7.5) * hits + makeup_ratio(5.5) * ticks, makeup_ratio(6.0) * slides)
    heard = hits + ticks + slides + room
    return (band(heard, 50, 19000) + background())[None]


def roll_off(x):
    return signal.sosfilt(signal.butter(12, 16010, fs=SR, output="sos"), x)


def record(dry):
    return roll_off(dry)


dry = scene()
out = record(dry)
transcribe(out)
```